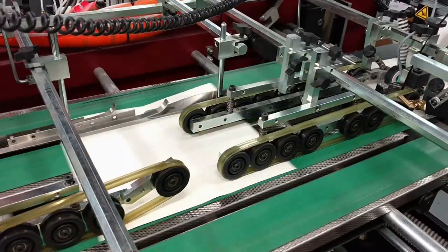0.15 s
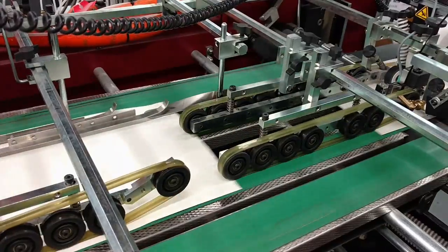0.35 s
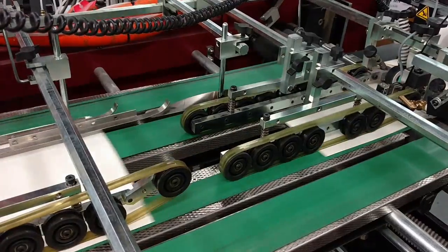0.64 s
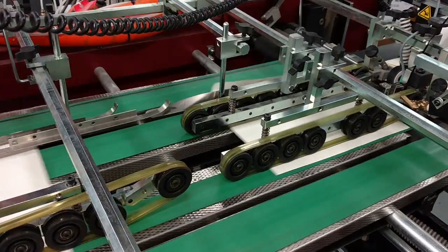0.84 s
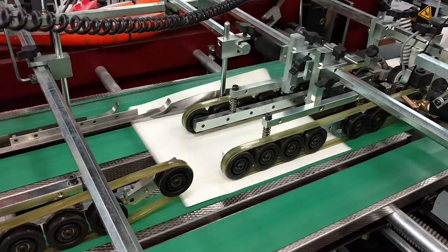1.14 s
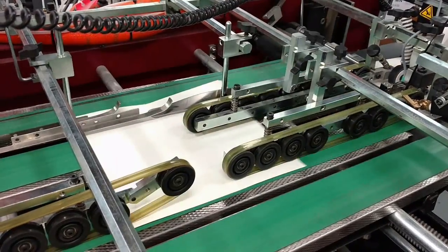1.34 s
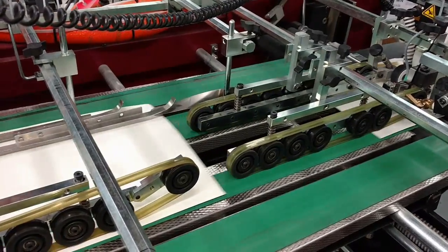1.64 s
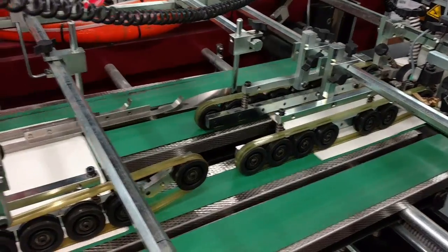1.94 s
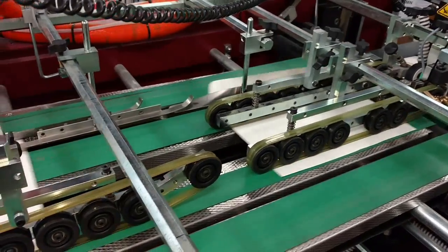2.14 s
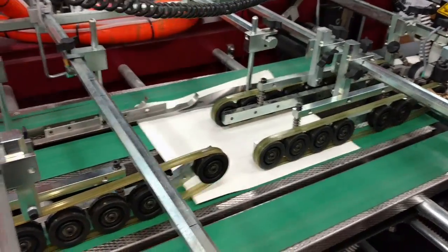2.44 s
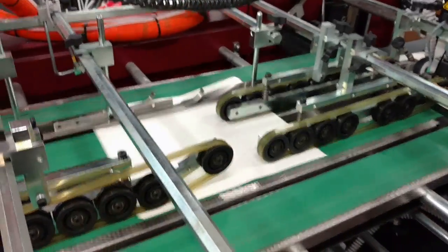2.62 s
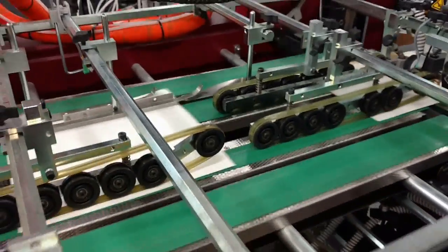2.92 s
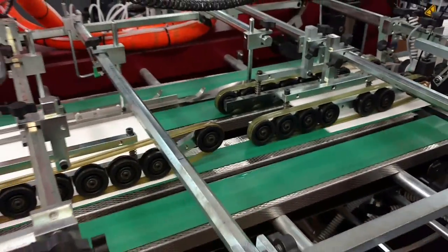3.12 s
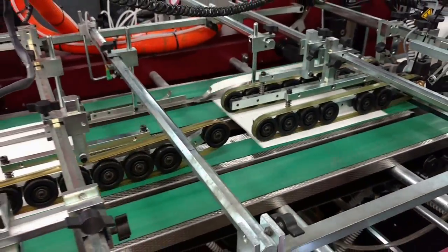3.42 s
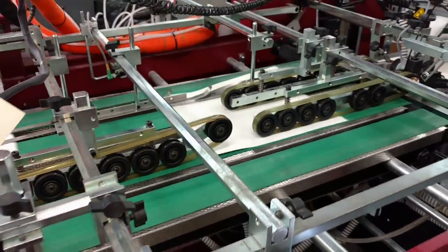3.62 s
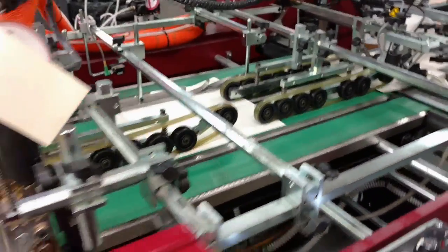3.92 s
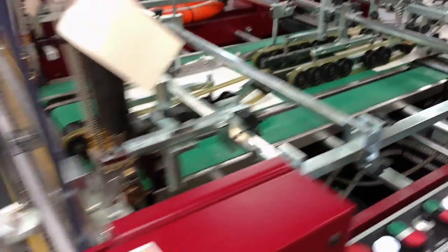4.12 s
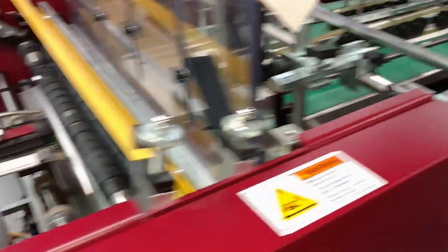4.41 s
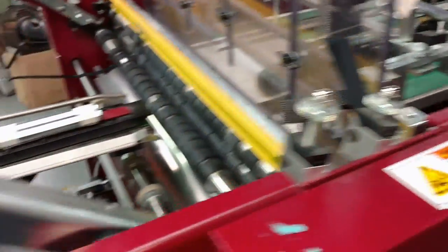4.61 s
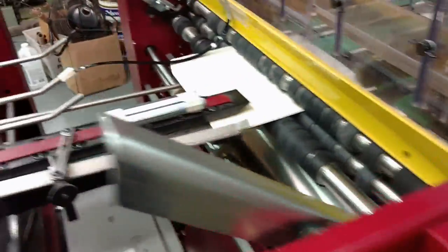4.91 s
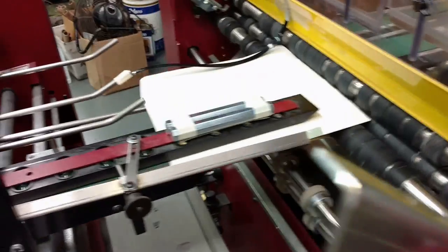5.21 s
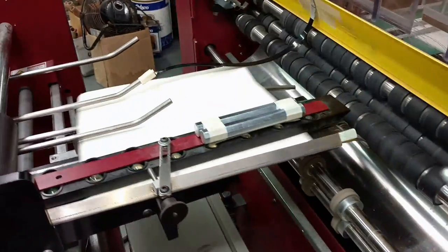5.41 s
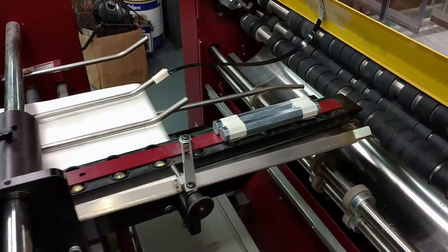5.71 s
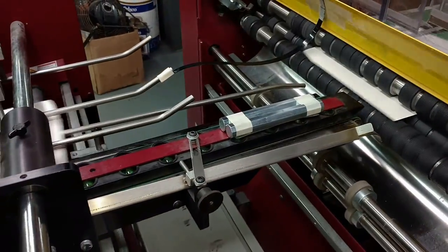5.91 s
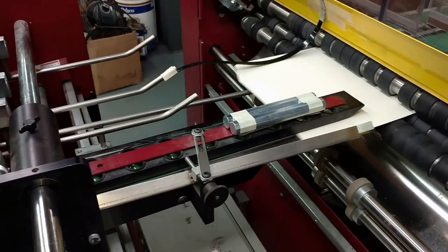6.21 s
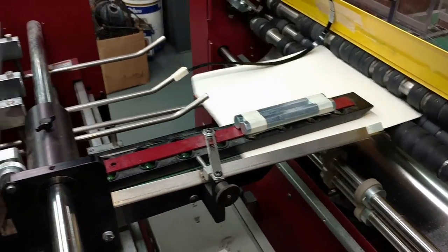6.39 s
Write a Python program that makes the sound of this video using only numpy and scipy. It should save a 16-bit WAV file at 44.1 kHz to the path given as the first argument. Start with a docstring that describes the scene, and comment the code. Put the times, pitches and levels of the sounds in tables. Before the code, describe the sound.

Strong airy jet hiss over whirring belts and rumbling rollers on a paper folding line, then the hiss fades as rapid mechanical knocking comes close.

```python
"""An air jet hisses over the whirr of belts and rollers on an envelope folding and gluing line.
A motor whines in three tones, and a geared shaft knocks on the frame at every turn.
A hand-held microphone moves from the belts to the folding rollers: it crosses the jet's beam once,
then leaves it behind as the knocking comes near and sheets squeak in the rollers.
Air, belts and paper are shaped stereo noise; frame modes ring to blows; motor, gear and drone are sines."""
import sys
import numpy as np
from scipy import signal
from scipy.fft import rfft, irfft
from scipy.io import wavfile
from scipy.ndimage import uniform_filter1d

SR = 44100
rng = np.random.default_rng(int(sys.argv[2]) if len(sys.argv) > 2 else 0)


def bounce(signal):
    """Save signal as a 16-bit WAV file at the path given by the first command-line argument."""
    frames = np.transpose(np.atleast_2d(signal))
    limited = np.clip(frames, -1, 1)
    pcm = np.round(limited * 32767).astype(np.int16)
    wavfile.write(sys.argv[1], SR, pcm)


N = 288851
SIZE, HOP = 1024, 256  # noise frames, samples
TIME = np.arange(N) / SR
FRAME_S = np.arange(N // HOP + 5) * HOP / SR
BIN_HZ = np.fft.rfftfreq(SIZE, 1 / SR)


def amp(db):
    """Decibels to gain."""
    return 10 ** (np.asarray(db) / 20)


def unit(x):
    """Scales to rms 1."""
    return x / np.sqrt(np.mean(abs(x) ** 2) + 1e-20)


def curve(rows, t, order=1):
    """One column of a table, read over time."""
    rows = np.array(rows)
    return np.interp(t, rows[:, 0], rows[:, order])


def colour(rows, hz=BIN_HZ, order=1):
    """One column of a table, read over log frequency."""
    rows = np.array(rows)
    return np.interp(np.log(hz + 1), np.log(rows[:, 0] + 1), rows[:, order])


def peaks(rows):
    """Boosts and dips (centre_hz, width_hz, gain_db) as a dB spectrum."""
    return sum(db / (1 + (2 * (BIN_HZ - hz) / width) ** 2) for hz, width, db in rows)


def bump(centre_s, half_width_s, order=6):
    """Smooth, flat-topped swell from 0 to 1 and back."""
    return 1 / (1 + abs((FRAME_S[:, None] - centre_s) / half_width_s) ** order)


def wander(rate_hz):
    """Slow random signal of rms 1: noise under a Gaussian low-pass."""
    hz = np.fft.rfftfreq(N, 1 / SR)
    lowpass = np.exp(-(hz / rate_hz) ** 2)
    return unit(irfft(rfft(rng.standard_normal(N)) * lowpass, N))


def patches(size):
    """Smooth random patches of rms 1, size = (frames, bins)."""
    field = rng.standard_normal((len(FRAME_S), len(BIN_HZ)))
    field = uniform_filter1d(field, size[0], axis=0)
    return unit(uniform_filter1d(field, size[1], axis=1))


# left-right likeness of the two sides, rippled by a delayed cross-feed: freq_hz, steady_share, ripple_depth
PAIR_LIKENESS = [(50, 0.38, 0.8), (297, 0.51, 0.09), (700, 0.38, 0.75), (1280, 0.21, 0.71),
                 (2030, 0.083, 0.73), (2350, -.05, .99), (2600, 0, 1), (2780, -.05, 1.02), (3050, .05, .9),
                 (3500, .25, 1), (3900, 0, .98), (4300, .1, .9), (5200, 0, .94), (7800, 0, .75),
                 (9200, 0.05, 0.55), (10740, 0.4, 0.25), (11700, 0.48, 0.42), (13000, .35, .5),
                 (14300, 0.3, 0.45)]
# jet bearing, positive = left louder: time_s, bearing (-1 to 1)
JET_BEARING = [(0, -0.073), (2.6, -0.039), (3.2, 0.14), (4.4, 0.76), (6.55, 0.95)]
PAIR_DELAY_S = 17 / SR


def pair_noise(shape_db, level_db, lean=0., shade_db=0.):
    """Shaped noise at two sides: a late, inverted share of each in the other ripples their likeness."""
    left, other = rng.standard_normal((2, len(FRAME_S), len(BIN_HZ), 2)) @ np.array([1, 1j])
    bearing = curve(JET_BEARING, FRAME_S)[:, None]
    phase = 2 * np.pi * BIN_HZ * PAIR_DELAY_S
    lean = lean * colour([(9700, 0.76), (11000, .25)])  # freq_hz, share: the top octave hardly shows bearing
    like = colour(PAIR_LIKENESS) - colour(PAIR_LIKENESS, order=2) * np.cos(phase)
    like = like + 1j * lean * bearing * np.sin(phase)
    like = like / np.maximum(abs(like) / .993, 1)  # likeness stays below 1
    right = like * left + np.sqrt(np.maximum(1 - abs(like) ** 2, 0)) * other
    shade = amp(shade_db * bearing)
    sides = np.array([left * shade, right / shade])
    sides = sides * unit(amp(shape_db)) * amp(level_db) / np.sqrt(SIZE / 3)
    return signal.istft(sides.swapaxes(1, 2), nperseg=SIZE, noverlap=SIZE - HOP)[1][:, :N]


# conveyor nearness: time_s, belts_and_rollers_rel_db, paper_rush_rel_db
BELT_NEARNESS = [(0, -0.5, 1.5), (1.1, 1, 1.3), (2.2, -0.5, 0.5), (3.2, -2.5, 2.5), (4.5, -5, -4),
                 (6.55, -6.5, 0)]
# folding roller and shaft nearness: time_s, rollers_rel_db, knocks_rel_db
FOLDER_NEARNESS = [(0, -9.5, -15), (3.7, -9.5, -16), (4.3, -10.5, -11.5), (4.75, -8, -7), (5.12, -5.5, -5),
                   (5.35, -1.5, -2), (6.55, -2.5, -1)]


def heard(belts_db, folder_db, order=1):
    """Level of a noise made by both conveyor and folding rollers: their powers add."""
    belts = amp(belts_db + curve(BELT_NEARNESS, FRAME_S, order))
    folder = amp(folder_db + curve(FOLDER_NEARNESS, FRAME_S))
    return 20 * np.log10(np.hypot(belts, folder))[:, None]


# jet level: time_s, rel_db
JET_LEVEL = [(0.15, -31), (0.79, -31), (0.9, -30), (2.4, -31.5), (3.01, -33), (3.5, -36.5), (4.4, -42.5),
             (4.95, -44.5), (5.5, -41.5), (6.4, -42)]
# jet spectrum: freq_hz, rel_db_per_hz
HISS_SPECTRUM = [(60, -35), (300, -29), (2000, -31), (4000, -9.5), (5200, -4.5), (6300, -2), (7000, -1.5),
                 (7900, -0.5), (8600, -2.5), (9600, -1), (10400, -1.5), (11700, -2), (12800, -5),
                 (14200, -2.5), (15000, -6)]
# narrow resonances near the nozzle: centre_hz, width_hz, gain_db
NOZZLE_MODES = [(6220, 90, 6), (7400, 90, 3), (7950, 90, 2.5), (9005, 100, 3), (9500, 90, 2),
                (11340, 200, 2.5), (14050, 80, 3.5), (14380, 120, 2)]
# jet beam sweeps on and off the microphone: centre_s, half_width_s, gain_db, lowest_hz
BEAM_SWEEPS = [(2.45, .25, 2.5, 10800), (2.655, 0.092, 3.5, 11400), (2.71, 0.093, 3.5, 6540),
               (2.78, 0.036, 1.5, 4500), (2.89, 0.038, -2, 2000)]


def air_jet(jet_db=7.0, sway_db=0.28, edge_hz=1200, patchy_db=1.0, ripple_db=1.45, far_db=-50.0, near_db=-25.0):
    """Turbulent air at a nozzle; its top octave is beamed forward, so it brightens on the axis."""
    level = curve(JET_LEVEL, FRAME_S)[:, None]
    beam = sum(gain_db * bump(centre_s, half_s) * np.clip((BIN_HZ - lowest_hz) / edge_hz, 0, 1)
               for centre_s, half_s, gain_db, lowest_hz in BEAM_SWEEPS)
    near = np.clip((level - far_db) / (near_db - far_db), 0, 1)
    # freq_hz, gain_db: far off, the frame shades the very top
    far_shade = colour([(11800, 0.5), (13200, 1.5), (15000, -13.5)])
    sway = sway_db * np.interp(FRAME_S, TIME, wander(9.9))[:, None]
    ripple = sway + patchy_db * patches(size=(6, 16)) + ripple_db * patches(size=(110, 3))
    level = level + jet_db + beam + near * peaks(NOZZLE_MODES) + (1 - near) * far_shade + ripple
    return pair_noise(colour(HISS_SPECTRUM), level, lean=1.24, shade_db=3.0)


# guide resonances: centre_hz, width_hz, gain_db, nearest_s, half_width_s
GUIDE_MODES = [(1790, 71, 5.5, 1.9, 1.5), (3470, 220, 5, 0.77, 0.88), (3990, 170, 5, 1.3, 2.7),
               (3270, 130, -1.5, 1.3, 0.43), (3330, 1200, 2.5, 3.55, 0.63), (2800, 170, 7.5, 3.34, 0.38),
               (1420, 220, 5, 3.38, 0.5), (1620, 100, 6, 4.1, 0.27), (4040, 250, 4, 5.9, 0.38)]
# resonance climbing as the microphone swings off the belts: time_s, centre_hz, gain_db
CLIMBING_MODE = [(2.35, 3100, -2), (2.6, 3340, 5.5), (2.95, 3360, 5.5), (3.35, 3450, 7.5), (3.7, 3800, 3),
                 (4.0, 3920, 7), (4.4, 4030, 0)]
CLIMB_WIDTH_HZ = 116


def guides():
    """Guide resonances come and go as the microphone passes, and one climbs: dB over time and frequency."""
    at_s = FRAME_S[:, None]
    climb = peaks([(curve(CLIMBING_MODE, at_s), CLIMB_WIDTH_HZ, curve(CLIMBING_MODE, at_s, order=2))])
    passing = sum(peaks([(hz, width_hz, gain_db)]) * bump(nearest_s, half_s, order=4)
                  for hz, width_hz, gain_db, nearest_s, half_s in GUIDE_MODES)
    return climb + passing


# roller spectrum: freq_hz, rel_db_per_hz
RUMBLE_SPECTRUM = [(20, -29), (55, -24), (95, -11), (140, -0.5), (195, 4), (260, 0.5), (330, 4), (480, 1.5),
                   (750, 1), (1100, -3.5), (2000, -29)]
# belt spectrum: freq_hz, rel_db_per_hz
WHIRR_SPECTRUM = [(60, -45), (300, -24), (650, -16), (900, -5), (1150, 1.5), (1450, 1.5), (1800, 1),
                  (2050, 1), (2500, 1.5), (3200, 4), (6000, -36)]
# paper spectrum: freq_hz, rel_db_per_hz
RUSH_SPECTRUM = [(60, -40), (1500, -19.5), (2150, -2), (2450, -28), (2800, -0.5), (3250, 1), (3600, 1.5),
                 (4000, 3), (4600, 2), (5400, -1), (8000, -3.5), (15000, -12)]
# folding roller colour, boosts and dips: centre_hz, width_hz, gain_db (before nearness)
ROLLER_COLOUR = [(180, 80, -1.5), (320, 130, -4.5), (1170, 200, 7), (814, 150, 2)]
# close-up base levels: belts_db, folder_db
RUMBLE_DB, WHIRR_DB, RUSH_DB = (-46.5, -36), (-35, -32), (-34.5, -34)
PATCHY_DB, RIPPLE_DB = 1.3, 2.1  # rms of quick patches, of slow random ripple over frequency


def transport(whirr_share=1.0, gust_rumble_db=5.0, gust_whirr_db=3.5, gust_s=0.13):
    """Rollers rumble, belts whirr, paper rushes; a slow random ripple colours belts and paper."""
    blown = bump(GUST_AT_S, gust_s, order=4)  # rumble and whirr swell with the gust
    rollers = amp(curve(FOLDER_NEARNESS, FRAME_S))[:, None] * peaks(ROLLER_COLOUR)
    rumble_db = heard(*RUMBLE_DB) + gust_rumble_db * blown + rollers
    whirr_db = heard(*WHIRR_DB) + gust_whirr_db * blown
    ripple = PATCHY_DB * patches(size=(8, 8)) + RIPPLE_DB * patches(size=(130, 2))
    rush_db = heard(*RUSH_DB, order=2) + ripple
    passing = guides()
    rumble = pair_noise(colour(RUMBLE_SPECTRUM), rumble_db)
    whirr = pair_noise(colour(WHIRR_SPECTRUM) + passing, whirr_db + whirr_share * ripple)
    rush = pair_noise(colour(RUSH_SPECTRUM) + passing, rush_db, lean=0.1)
    return rumble + whirr + rush


# motor: time_s, hum_db (before load swell), whine_db, upper_whine_db
MOTOR_LEVELS = [(0, -49.5, -51.5, -48), (.35, -47, -49, -53), (.8, -45.5, -48.5, -61.5),
                (1.3, -46, -49.5, -62), (1.9, -47.5, -48, -61), (2.35, -44, -53, -48),
                (2.6, -51.5, -54, -51), (2.9, -50.5, -48.5, -52), (3.35, -53, -47, -47),
                (3.6, -53.5, -47, -47), (3.8, -54, -53, -58), (4.0, -59, -50, -51), (4.2, -55, -48.5, -50),
                (4.7, -60, -65, -54), (6.55, -57, -53, -62)]
MOTOR_HZ, MOTOR_ORDERS = 169.7, (2, 5, 6)  # loaded rate, multiples heard
FREE_RUN = .008  # largest speed gain between sheets, share
BEAT_S, BEAT_PEAK_AT_S, BEAT_DB = 1.17, 0.768, 2.5  # sheet period, heaviest load, hum swell


def motor(waver=0.0011, flutter=0.28, lag_rad=0.36):
    """Three motor orders; each sheet's load makes it hum louder, and between sheets it runs faster."""
    load = np.cos(2 * np.pi * (TIME - BEAT_PEAK_AT_S) / BEAT_S)
    speed = 1 + FREE_RUN * ((1 - load) / 2) ** 2 + waver * wander(5.3)
    turns = np.cumsum(MOTOR_HZ * speed) / SR
    hum, whine, upper = (curve(MOTOR_LEVELS, TIME, order=k + 1) for k in range(3))
    side_phase = np.array([[0], [lag_rad]])
    out = np.zeros((2, N))
    for order, level_db in zip(MOTOR_ORDERS, (hum + BEAT_DB * load, whine, upper)):
        sway = unit(1 + flutter * (wander(22) + 1j * wander(31.0)))
        tone = (sway * np.exp(1j * (2 * np.pi * order * turns + side_phase))).real
        out += np.sqrt(2) * amp(level_db) * tone
    return out


# machine frame modes: freq_hz, rel_db, t60_s
FRAME_MODES = [(137.6, 0, 0.12), (186, 1, .12), (237, -7, 0.06), (290, 1, 0.055), (322, 0.5, 0.045),
               (590, -11, 0.055), (727, 2, 0.07), (1140, -4, .04), (1595, -2, 0.033)]
# blows within one turn: turn_share, level_db (before nearness), middle_hz, spread_octaves
TURN_BLOWS = [(-.05, -59, 170, .35), (-.015, -42.5, 310, .3), (.07, -52, 580, .3), (.1, -53, 1600, .3),
              (.25, -54, 330, .2), (.25, -46.5, 745, .35), (.62, -57, 300, .3), (.66, -52, 1140, .25),
              (.92, -52, 1140, .25)]
SHAFT_HZ, KNOCK_AT_S = 12.476, 5.853  # turning rate, one main knock
UNEVEN_DB, SLIP_S = 1.1, .0002  # spread of strength, of timing


def shaft(lag_rad=0.79):
    """Each turn strikes the frame in one pattern; each blow lands elsewhere and wakes its own modes."""
    turn, rise_s = np.arange(-80, 12), .004
    t, side_phase = np.arange(SR // 4) / SR, np.array([[lag_rad], [0]])
    knocks = np.zeros((2, N))
    for share, level_db, middle_hz, octaves in TURN_BLOWS:
        slip, uneven = rng.standard_normal((2, len(turn)))
        at_s = KNOCK_AT_S + (turn + share) / SHAFT_HZ + SLIP_S * slip
        at = np.round((at_s + 1) * SR).astype(int)  # one second of run-up
        blows = np.zeros(N + 2 * SR)
        blows[at] = amp(UNEVEN_DB * uneven)
        ring = np.zeros((2, len(t)))
        for hz, mode_db, t60_s in FRAME_MODES:
            woken = np.exp(-(np.log2(hz / middle_hz) / octaves) ** 2)
            ring += woken * amp(mode_db - 60 * t / t60_s) * np.sin(2 * np.pi * hz * t + side_phase)
        ring = ring * (1 - np.exp(-t / rise_s))  # a blow takes a moment to spread through the frame
        struck = signal.oaconvolve(blows[None], ring, axes=1)[:, SR:SR + N]
        knocks += amp(level_db) * unit(struck)
    open_frame = signal.butter(4, 95, "high", fs=SR, output="sos")  # the knocks carry little deep bass
    knocks = signal.sosfilt(open_frame, knocks)
    return knocks * amp(curve(FOLDER_NEARNESS, TIME, order=2) + np.array([[1.2], [-1.2]]))


# shaft drone: turning_rate_multiple, belts_db, folder_db (before nearness)
DRONE_TONES = [(11, -63.5, -57), (15, -59, -56), (19, -67.5, -53), (23, -62, -47)]


def drone(flutter=0.23, left_db=3.0):
    """Multiples of the shaft's turning rate carry along the whole frame."""
    turns, near_db = TIME * SHAFT_HZ, curve(FOLDER_NEARNESS, TIME, order=2)
    tones = np.zeros(N)
    for order, belts_db, folder_db in DRONE_TONES:
        level = np.hypot(amp(belts_db), amp(folder_db + near_db))
        swell = 1 + flutter * wander(8.0)
        phase = 2 * np.pi * (round(order) * turns + rng.random()) + flutter * wander(8.0)
        tones += level * swell * np.sin(phase)
    return np.sqrt(2) * tones * amp([[left_db], [-left_db]])


RATTLE_DB, RATTLE_DECAY_S, RATTLE_TOP_HZ = -46, 0.11, 980  # level before nearness, 1/e decay, band top


def rattle(apart=0.5):
    """Loose parts rattle in the same way after every main knock: one noise burst, repeated each turn."""
    since_s = (TIME - KNOCK_AT_S) % (1 / SHAFT_HZ)
    loose = rng.standard_normal(SR) + apart * rng.standard_normal((2, SR))
    shaken = loose[:, (since_s * SR).astype(int)] * np.exp(-since_s / RATTLE_DECAY_S)
    band = signal.butter(3, [130, RATTLE_TOP_HZ], "band", fs=SR, output="sos")
    return unit(signal.sosfilt(band, shaken)) * amp(RATTLE_DB + curve(FOLDER_NEARNESS, TIME))


def gear():
    """A gear on the shaft sings at its tooth rate and throbs once a turn, as it takes up the load."""
    teeth, loaded_at_turn, throb, gear_db = 58, .4, 1., -55  # level before nearness
    turns = (TIME - KNOCK_AT_S) * SHAFT_HZ
    swell = unit(1 + throb * np.cos(2 * np.pi * (turns - loaded_at_turn)) + 0.14 * wander(8.9))
    level = amp(curve(FOLDER_NEARNESS, TIME, order=2) + gear_db)
    return level * swell * np.sqrt(2) * np.sin(2 * np.pi * teeth * turns)


GUST_AT_S, GUST_HALF_S, GUST_DB = 2.62, 0.098, -54.5  # the jet brushes the microphone


def gust(centre_hz=150, spread=0.25):
    """A soft low flutter where the air stream meets the microphone: narrow-band noise."""
    shape_db = -np.minimum((np.log((BIN_HZ + 1) / centre_hz) / spread) ** 2 * 4, 80)
    return pair_noise(shape_db, GUST_DB + 10 * np.log10(bump(GUST_AT_S, GUST_HALF_S, order=4)))


# sheet squeaks: centre_s, half_width_s, pitch_hz, level_db
SHEET_SQUEAKS = [(5.41, .015, 1640, -40), (5.73, .055, 1100, -43), (6.115, 0.024, 1570, -36.5)]


def squeak():
    """Sheets slip between the folding rollers: short sines of steady pitch under Gaussian swells."""
    out = np.zeros(N)
    for centre_s, half_s, pitch_hz, level_db in SHEET_SQUEAKS:
        swell = np.exp(-((TIME - centre_s) / half_s) ** 2)
        out += amp(level_db) * swell * np.sqrt(2) * np.sin(2 * np.pi * pitch_hz * TIME)
    return out


def scene():
    """The whole running line."""
    return air_jet() + transport() + motor() + shaft() + drone() + rattle() + gear() + gust() + squeak()


EDGE_HZ = 15080


def record(dry):
    """The recorder's steep band limit: a linear-phase low-pass."""
    lowpass = signal.firwin(511, EDGE_HZ, window=("kaiser", 9), fs=SR)
    return signal.oaconvolve(dry, lowpass[None], "same", axes=1)


dry = scene()
out = record(dry)
bounce(out)
```